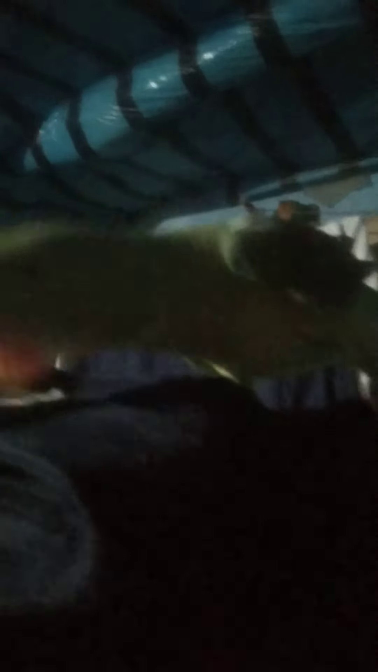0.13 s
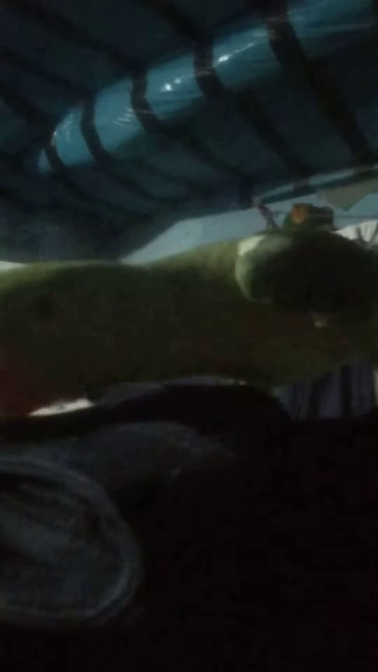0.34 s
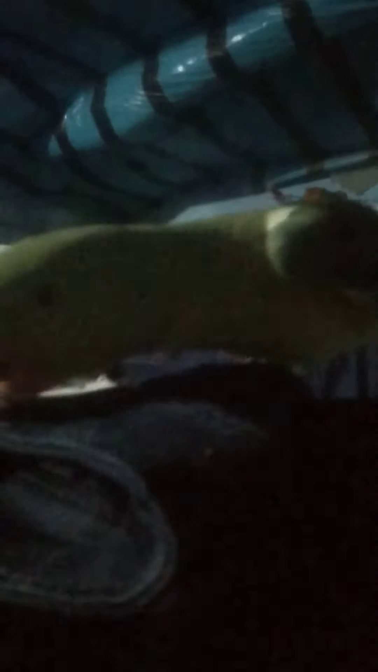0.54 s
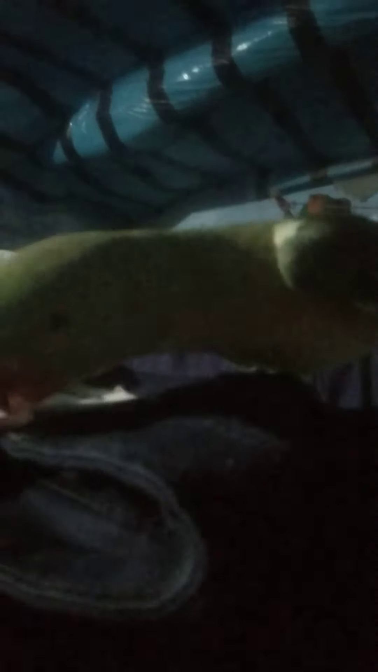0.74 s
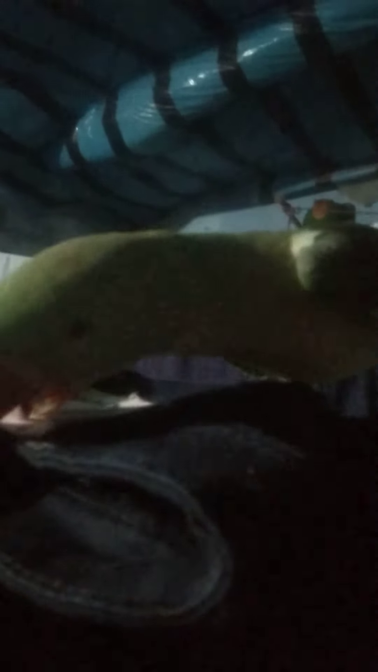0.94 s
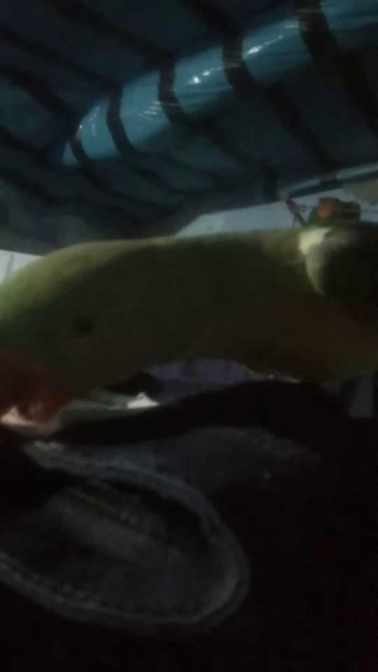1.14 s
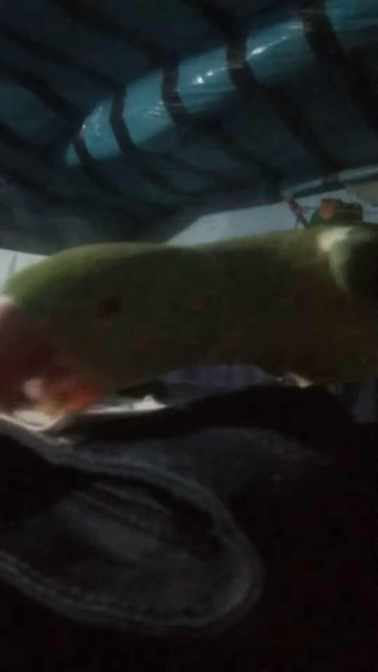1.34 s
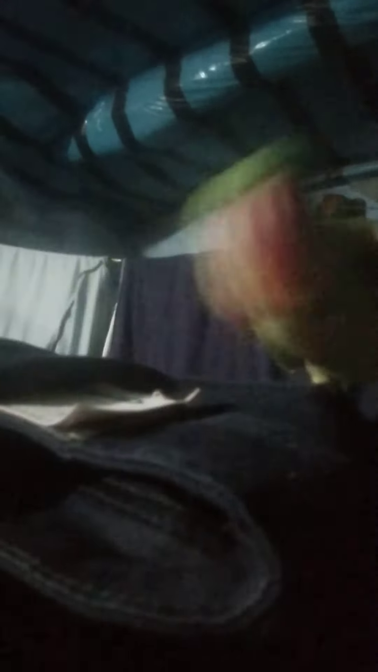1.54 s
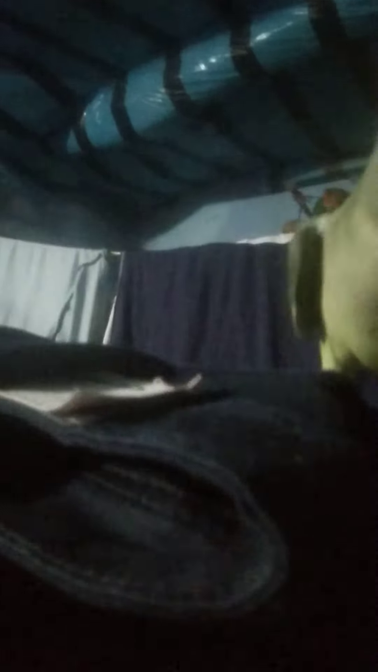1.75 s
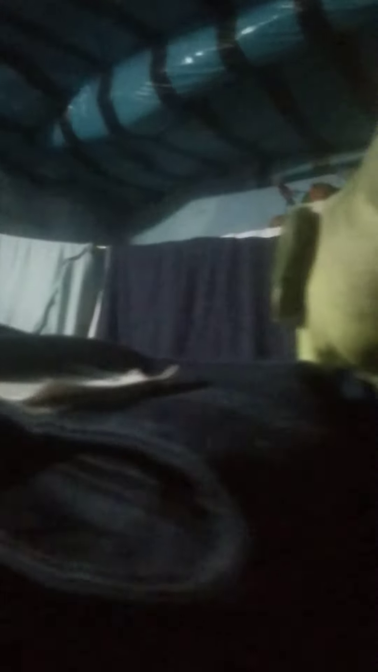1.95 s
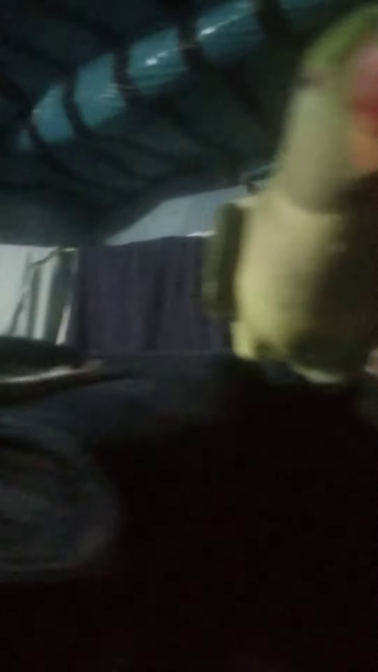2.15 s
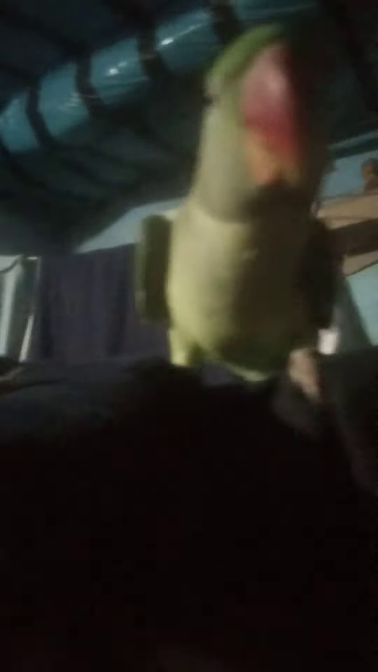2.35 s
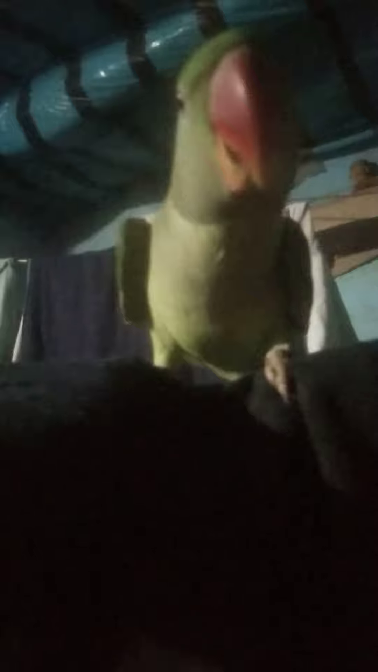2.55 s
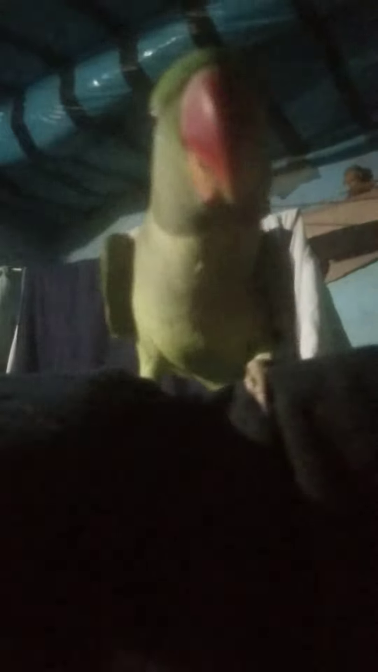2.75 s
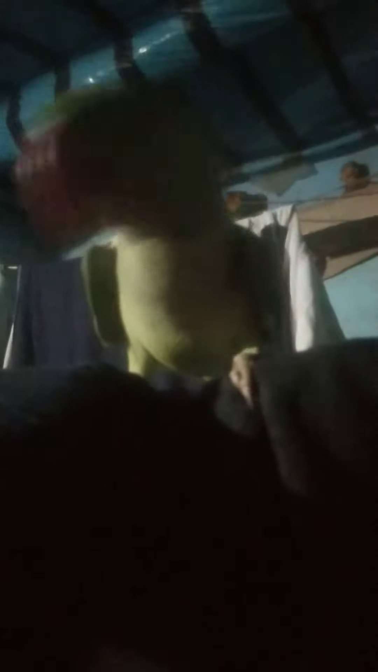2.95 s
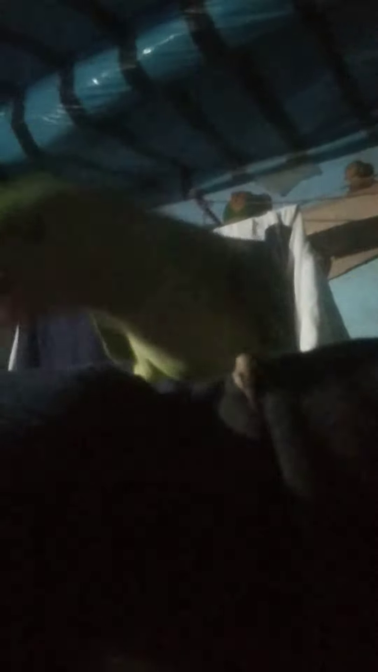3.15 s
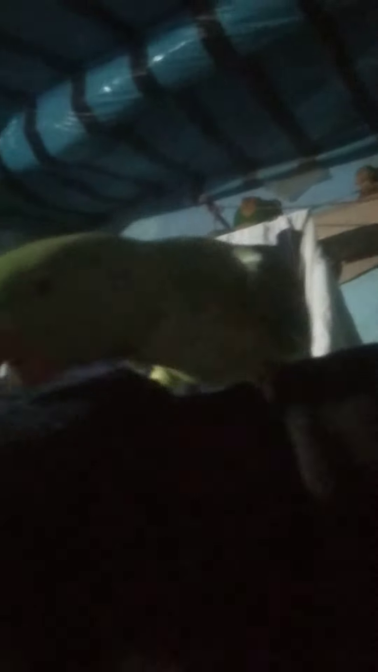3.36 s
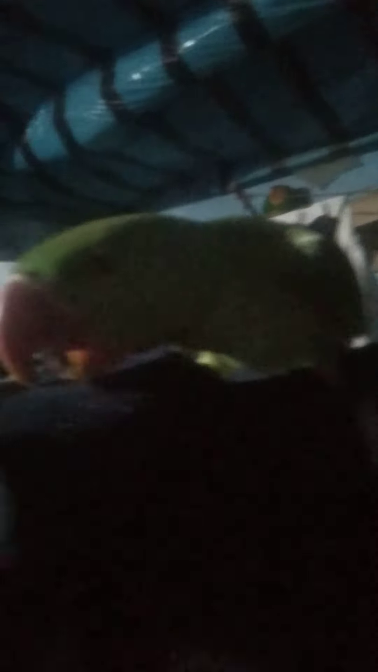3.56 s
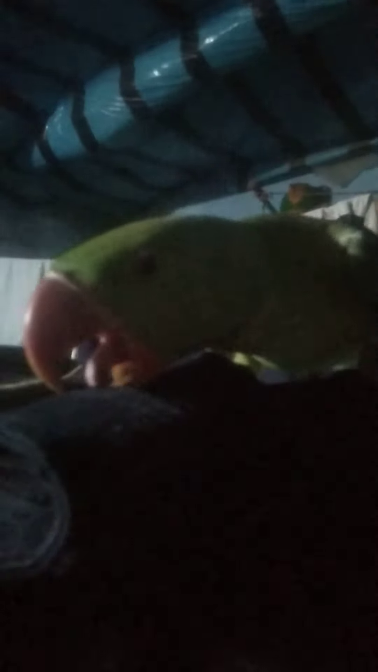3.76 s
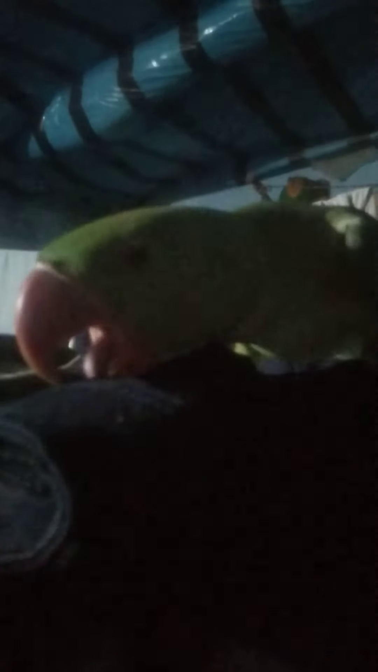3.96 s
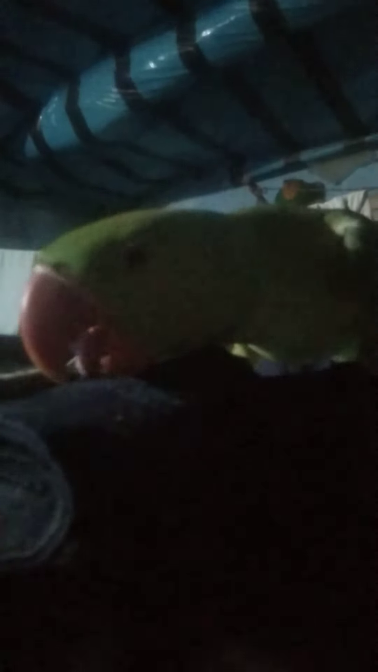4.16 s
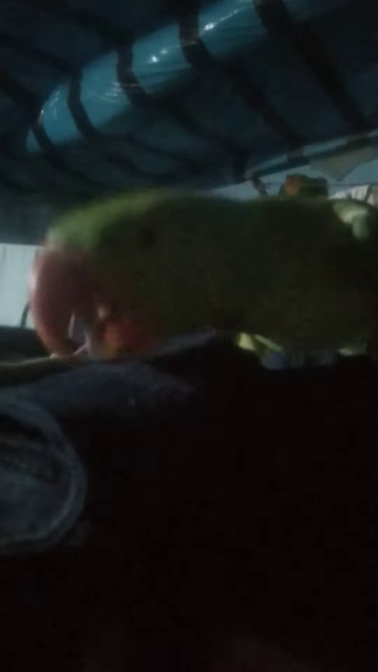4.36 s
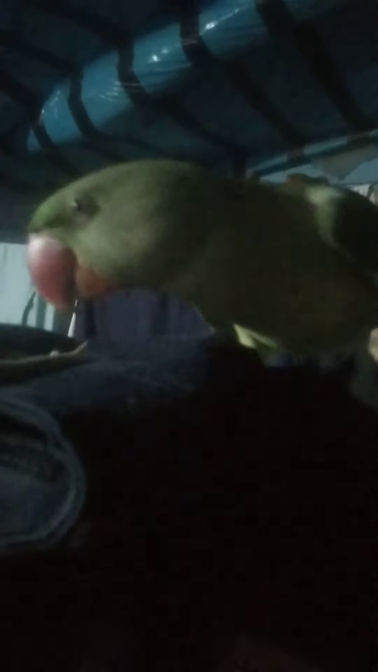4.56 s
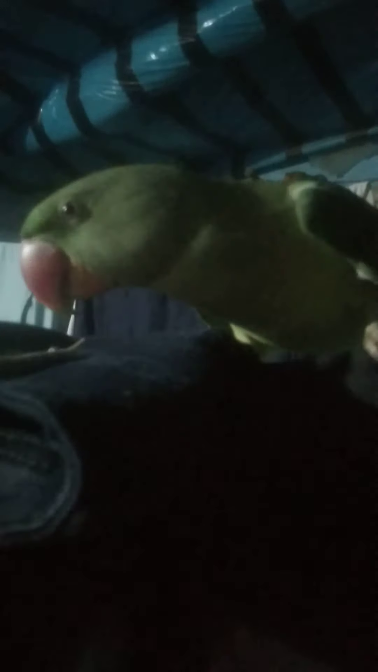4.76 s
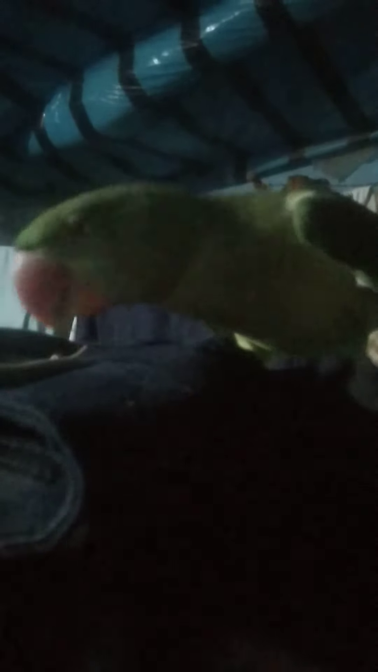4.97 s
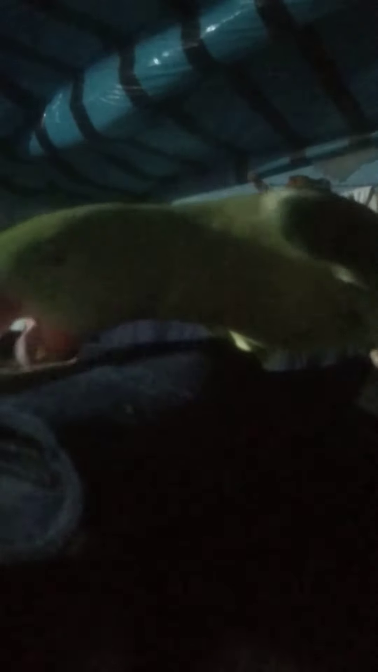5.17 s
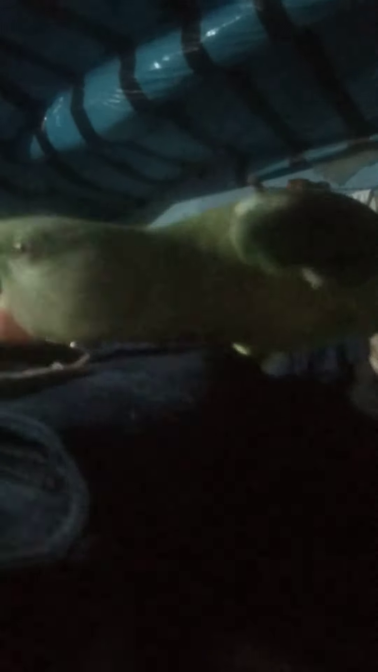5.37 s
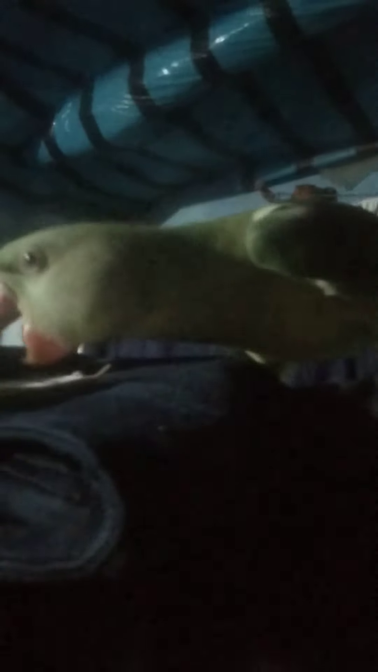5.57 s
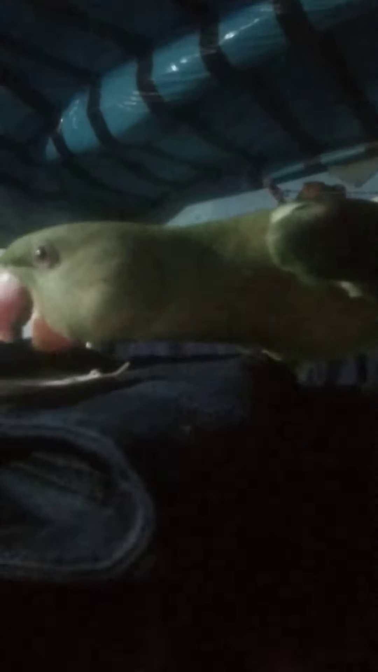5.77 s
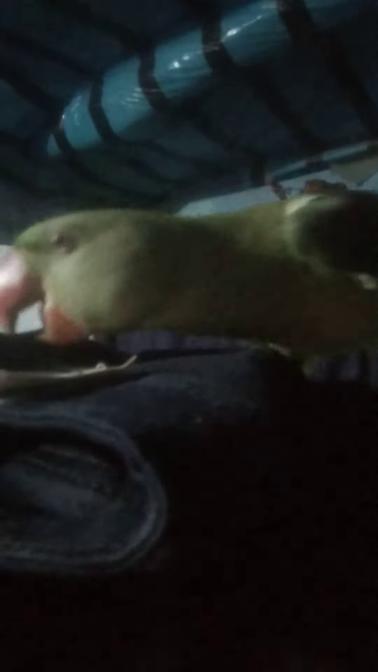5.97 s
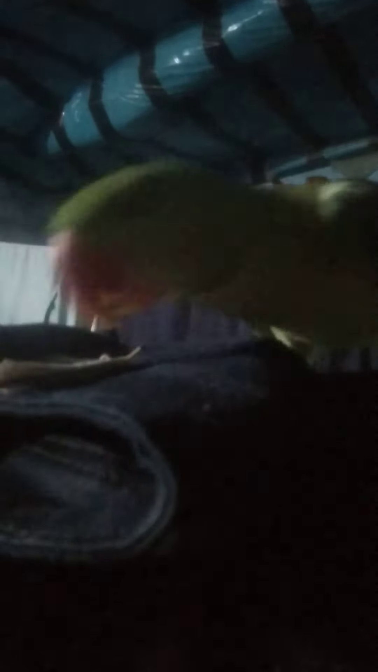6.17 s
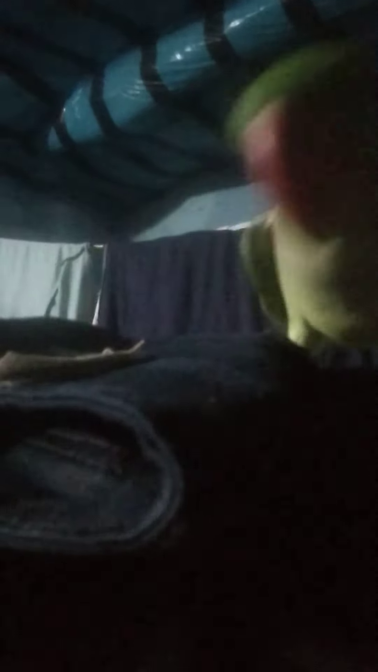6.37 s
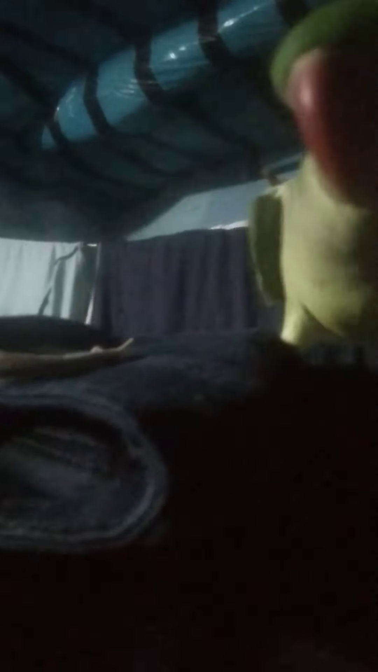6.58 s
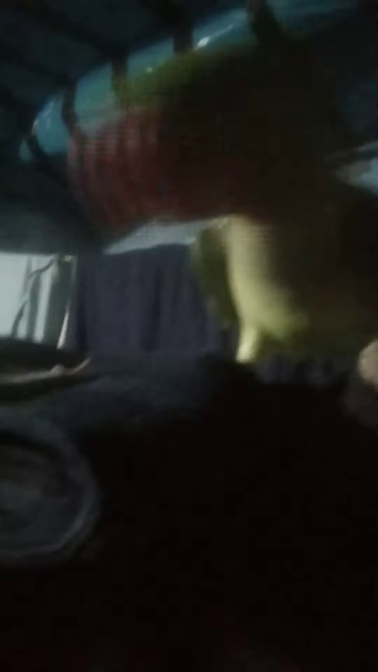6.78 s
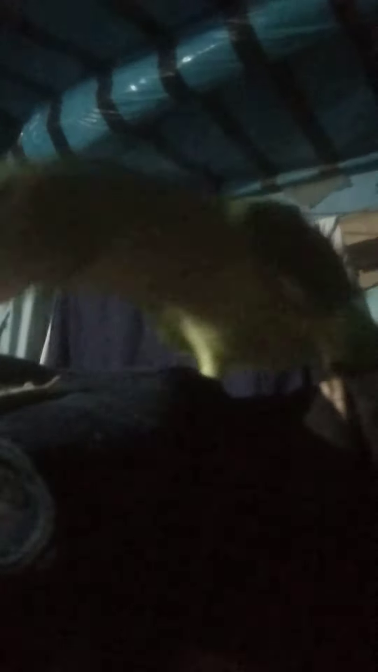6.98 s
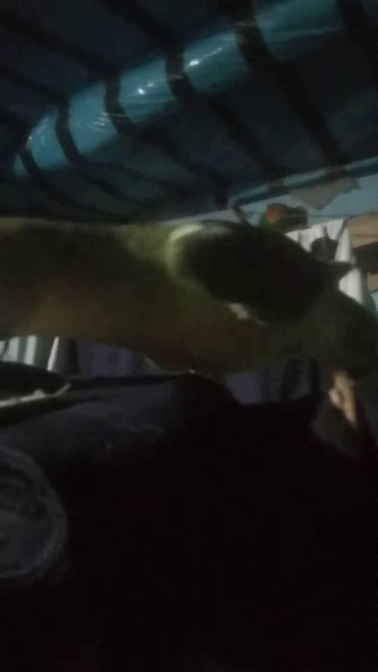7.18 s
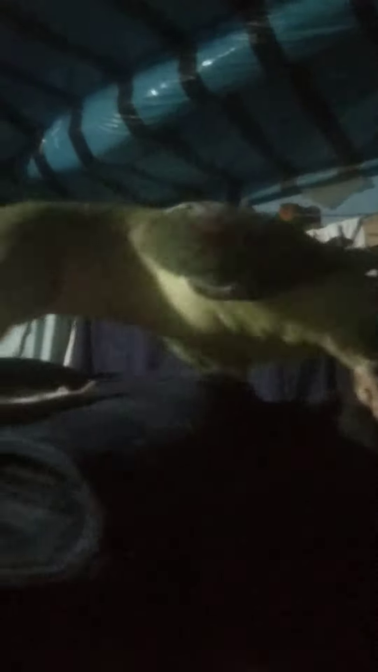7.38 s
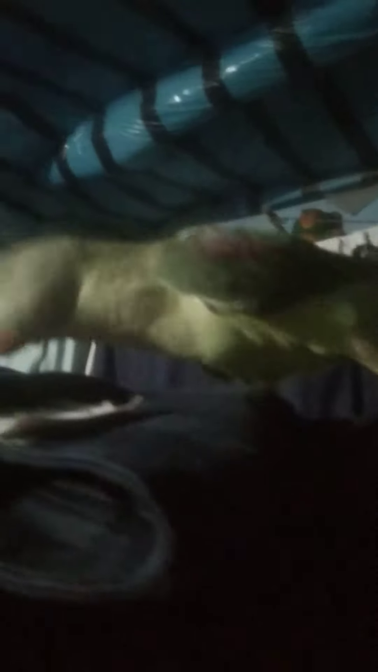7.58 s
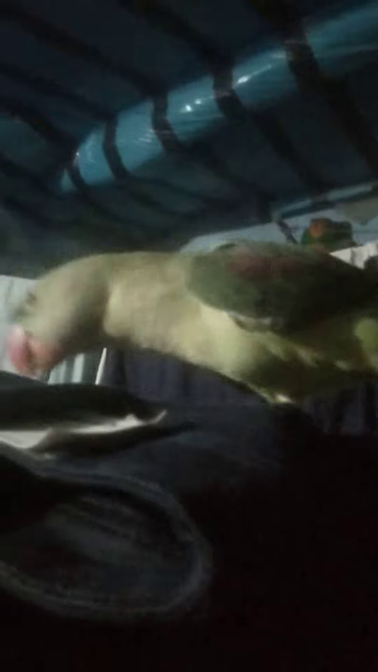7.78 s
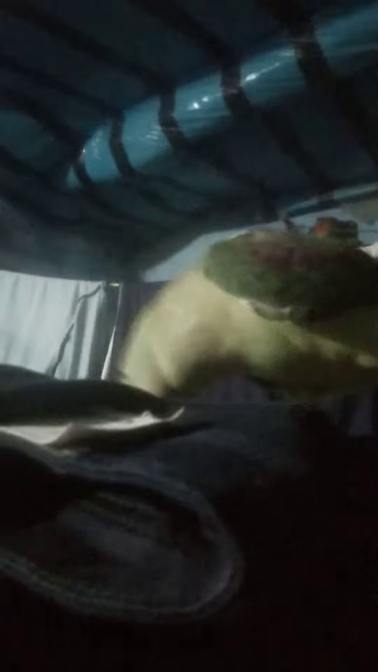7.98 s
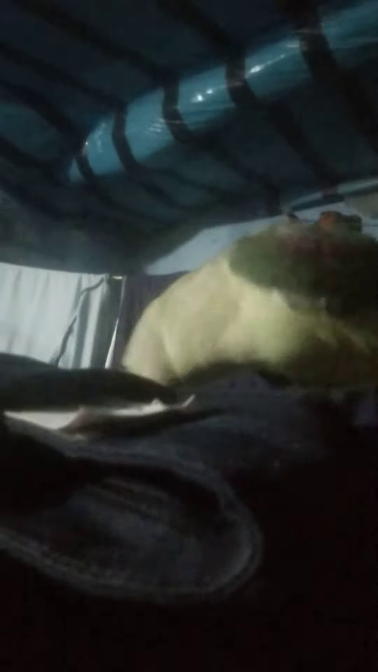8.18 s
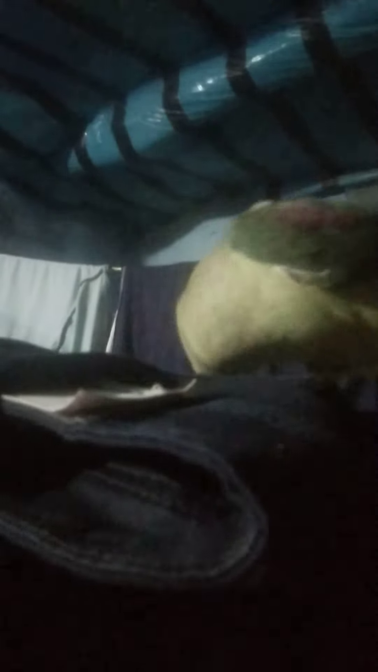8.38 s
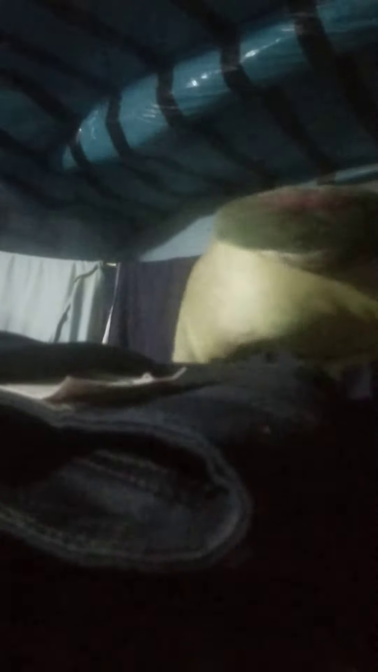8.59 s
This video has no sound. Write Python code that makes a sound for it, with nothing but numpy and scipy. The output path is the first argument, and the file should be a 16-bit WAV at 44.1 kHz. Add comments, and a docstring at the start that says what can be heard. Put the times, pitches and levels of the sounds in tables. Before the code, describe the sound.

Sharp, dry clicks come in four short runs as a parrot taps and bites at a phone with its beak, close by. A soft footstep on cloth falls after the first run, and another just before the last, which is quieter. The clicks shift between hollow and bright, with very little echo in the small room. Underneath, a motor hums faintly beneath an even hiss.

```python
"""Dry little clicks, about four a second in four bouts: a parrot nibbles a phone in a small, soft room.
Each bite is a few quick taps of the beak. Every tap rings five resonances (pitches that sound briefly):
hollow, knock, clack, rim and edge, from low to high. All five shift from tap to tap as the beak closes.
Twice the bird steps on cloth with a soft thud. Behind it all, a faint motor hums under a steady hiss."""
import sys
import numpy as np
from scipy import signal
from scipy.fft import rfft, irfft
from scipy.io import wavfile
from scipy.ndimage import uniform_filter1d, minimum_filter1d

SR = 44100
rng = np.random.default_rng(int(sys.argv[2]) if len(sys.argv) > 2 else 0)


def transcribe(signal):
    """Save signal, clipped to [-1, 1], as a 16-bit WAV file at the path in sys.argv[1]."""
    frames = np.atleast_2d(signal).T
    limited = np.clip(frames, -1, 1)
    pcm = np.round(limited * 32767).astype(np.int16)
    wavfile.write(sys.argv[1], SR, pcm)


N = 381024


def from_db(db):
    """Turns decibels into a number to multiply a sound by."""
    return 10 ** (np.asarray(db) / 20)


def unit(x):
    """Scales a sound so that its average level (rms) is one."""
    return x / np.sqrt(np.mean(x ** 2) + 1e-30)


def along(points, hz):
    """Reads between the rows of a (frequency, value) table, giving each octave equal space."""
    f, value = np.transpose(points)
    return np.interp(np.log(hz + 1), np.log(f + 1), value)


def add(mix, s, sound):
    """Mixes in a sound with its middle at s seconds."""
    part = mix[round(s * SR) - len(sound) // 2:][:len(sound)]
    part += sound[:len(part)]


def drift(rate_hz):
    """A slow random wobble, mostly slower than rate_hz."""
    hz = np.fft.rfftfreq(N, 1 / SR)
    return unit(irfft(rfft(rng.standard_normal(N)) / (1 + (hz / rate_hz) ** 4), N))


# the tone of the hiss, from bass to treble: (frequency [Hz], relative level [dB])
HISS_COLOUR = [(25, -22), (42, -12), (70, -0.5), (270, 1), (340, -3), (1400, -4.5), (2100, -1.5),
               (2600, -4.5), (4250, -6), (4750, -11), (6300, -6.5), (7200, -13), (8400, -28.5),
               (12000, -41), (15500, -37)]
# broad resonances in the room's air: (frequency [Hz], width [Hz], boost [dB])
AIR_RESONANCES = [(1043, 75, 6.5), (1716, 210, 3.5)]

def hiss(level_db=-53):
    """The air and the microphone make a steady noise, a little stronger around two pitches."""
    hz = np.fft.rfftfreq(N, 1 / SR)
    peaks_db = sum(db / (1 + (2 * (hz - f) / width) ** 2) for f, width, db in AIR_RESONANCES)
    colour = from_db(along(HISS_COLOUR, hz) + peaks_db)
    return from_db(level_db) * unit(irfft(rfft(rng.standard_normal(N)) * colour, N))


# the motor's tones: (pitch [Hz], average level [dB])
MOTOR_TONES = [(75.4, -70), (100, -72.5), (150.7, -68), (199.2, -89), (226.1, -78.5), (301.5, -67.5),
               (554.5, -73.5), (602.9, -79), (651.4, -87.5)]

def motor_hum():
    """A motor hums with low tones that waver a little in loudness and pitch."""
    t, out = np.arange(N) / SR, np.zeros(N)
    for hz, db in MOTOR_TONES:
        flutter = 1 + .28 * drift(3)
        tone = np.sin(2 * np.pi * hz * t + .5 * drift(4))
        out += from_db(db) * unit(flutter * tone)
    return out


# steps on the cloth: (time [s], level before fading [dB], pitch [Hz], fade in and out [s])
FOOTFALLS = [(2.272, -40, 96, 0.0026), (7.166, -35.5, 92.5, 0.0023)]

def footsteps():
    """A foot lands on cloth and gives it one soft, low push."""
    out, t = np.zeros(N), np.arange(-SR // 10, SR // 10) / SR
    for s, db, hz, fade_s in FOOTFALLS:
        add(out, s, from_db(db) * np.sin(2 * np.pi * hz * t) / np.cosh(t / fade_s))
    return out


# how fast the echo dies away: (frequency [Hz], time to fade by 60 dB [s])
ECHO_FADE = [(300, 0.15), (1000, 0.15), (2500, 0.12), (4000, 0.12), (7000, 0.11), (12000, 0.038)]
# the tone the room gives its echo: (frequency [Hz], boost or cut [dB])
ECHO_COLOUR = [(500, 8), (1100, -5.5), (1700, 8), (2400, -3), (3100, 0), (4000, -1), (4600, 3), (5300, 8),
               (6500, 2), (8000, 12.5), (12000, -5.5)]

def room_echo(sound, near_db=-16, near_s=0.0094, spread_s=0.0046, tail_db=-17, onset_s=0.0014):
    """Nearby surfaces throw back quick echoes, then a short tail; the paths change as the head moves."""
    paths, size = 3, 16384
    out, t, clock = np.zeros(N), np.arange(size) / SR, np.arange(N) / SR
    times, room_db, *_ = np.transpose(BITE_SPOTS)  # listed with the bites below
    sent = sound * from_db(np.interp(clock, times, room_db))
    colour = from_db(along(ECHO_COLOUR, np.fft.rfftfreq(size, 1 / SR)))
    for k in range(paths):
        near, tail = rng.standard_normal((2, size))
        near *= np.exp(-.5 * ((t - near_s) / spread_s) ** 2) * (1 - np.exp(-(2 * t / near_s) ** 2))
        hz, age, bands = signal.stft(tail, SR, nperseg=128)
        fade = from_db(-60 * age / along(ECHO_FADE, hz)[:, None])  # the treble dies first
        tail = signal.istft(bands * fade, SR)[1][:size]
        tail *= 1 - np.exp(-(t / onset_s) ** 2)
        echo = from_db(near_db) * near / np.linalg.norm(near)
        echo += from_db(tail_db) * tail / np.linalg.norm(tail)
        share = np.sqrt(2 / paths) * np.cos(np.pi * (clock + k / paths))  # the paths take turns
        out += signal.oaconvolve(sent * share, irfft(rfft(echo) * colour))[:N]
    return out


# the five resonances, hollow to edge; a wider one rings more briefly: (width [Hz])
RING_WIDTHS = [490, 526, 650, 880, 690]
# how the microphone hears the ringing: (frequency [Hz], boost or cut [dB])
MIC_COLOUR = [(100, -8.5), (400, -1), (600, -9.5), (760, -2.5), (1200, -1.5), (1650, -7), (2200, 3.5),
              (2750, 6), (3150, 3), (3600, 5), (6700, -0.5), (8300, -14.5), (12000, -31.5), (15500, -20.5)]
# the bare tick of a beak on a hard surface: (frequency [Hz], relative level [dB])
TICK_COLOUR = [(200, -15.5), (450, -12.5), (800, 4), (3000, 9), (6800, -22), (8300, -24.5), (10000, -27),
               (12500, -32.5), (15000, -33)]

def beak_tap(pitches, levels_db, tick_db, scuff=1.57, grip_s=0.0017, slip_s=0.0022, swell_s=0.000717):
    """The beak grips, snaps and slips; this short push makes a tick and rings five resonances."""
    size, level_span_s = 2048, .005
    t, hz = (np.arange(size) - size // 2) / SR, np.fft.rfftfreq(size, 1 / SR)
    grit = rng.standard_normal(size) * np.exp(-np.where(t < 0, (t / grip_s) ** 2, t / slip_s))
    force = rfft((t == 0) + scuff * grit / np.linalg.norm(grit))  # one sharp click plus a scrape
    # little sound gets into the air below the lowest resonance
    bass_cut = from_db(-17) + 1 / (1 + (0.58 * pitches[0] / (hz + 1)) ** 10)
    # the rings need a moment to swell, so they start early and peak on the tap
    head_start = np.exp(2j * np.pi * (rng.random() + hz * swell_s))
    to_mic = bass_cut * from_db(along(MIC_COLOUR, hz)) * head_start
    sound = np.zeros(size)
    for k, (pitch, width, db) in enumerate(zip(pitches, RING_WIDTHS, levels_db)):
        # flipping every other ring makes neighbours cancel at the pitches between them
        ring = (-1) ** k / (1 + 2j * (hz - pitch) / width) ** 2
        sound += from_db(db) * unit(irfft(force * ring * to_mic))
    tick = unit(irfft(force * from_db(along(TICK_COLOUR, hz))))
    sound += from_db(tick_db) * np.std(sound) * tick
    return sound * np.sqrt(level_span_s * SR / size)  # levels count as averages over this short span


# where the beak is at work; a farther spot has more echo, a harder one more tick:
# (time [s], level sent to the room [dB], tick compared with the rings [dB],
#  rim compared with the other four rings [dB], edge pitch [Hz])
BITE_SPOTS = [(.3, 0.5, -11.5, -25.5, 5950), (.55, -5, -11.5, -27, 6630), (1.2, -2, -11.5, -24, 6600),
              (1.5, -2.5, -9.5, -14.5, 6600), (3.3, 1.5, -15, -17.5, 6700), (3.7, -2, -25.5, -16, 6100),
              (4.17, -3, -19.5, -19, 6490), (4.4, 1.5, -30, -19, 6340), (5.3, 2, -11.5, -15, 6330),
              (5.75, 2.5, -22, -19.5, 6480), (6, 1.5, -21, -24, 6200), (6.2, -1.5, -6.5, -49, 6420),
              (7.2, 4, -9, -39, 6930), (7.8, 4, -15, -31, 6800)]
# as the beak closes, hollow, clack and rim rise while knock and edge fall: (pitch step [ratio])
CLOSING_RATIOS = [1.112, 0.97, 1.014, 1.043, 0.982]
# a harder tap brings out the knock and the clack; hollow to edge: (growth [dB per dB of force])
RING_GROWTH = [0.91, 1.76, 1.3, 0.73, 0.82]
# one row a bite; forces are compared with the snap, the last three levels with the knock:
# (snap time [s], snap level [dB], touch comes earlier by [s], touch force [dB],
#  rebound comes later by [s], rebound force [dB], hollow pitch [Hz], knock pitch [Hz],
#  clack pitch [Hz], hollow level [dB], clack level [dB], edge level [dB])
BEAK_BITES = [(0.315, -12, .0045, -15, 0.0032, -2, 1130, 2550, 3500, -14.5, -2.5, -28),
              (0.5443, -24, .0085, -4, 0.01, -10, 880, 2060, 3520, -10.5, -8.5, -24),
              (0.7639, -28.5, 0.0027, -3.5, 0.0076, 0.5, 780, 2340, 3600, -3, -2.5, -10),
              (1.018, -21.5, .0032, -15, .0077, -4.5, 880, 2300, 3590, -9.5, -9.5, -21.5),
              (1.248, -18, 0.0079, -4.5, 0.012, -12, 900, 2100, 4120, -13.5, -10.5, -16.5),
              (1.481, -19, .004, -17, .0114, -2, 990, 2130, 4160, -7, -8.5, -18.5),
              (3.3413, -17, .005, -2, .007, -19, 1160, 2510, 3750, -16.5, -9, -14.5),
              (3.5535, -25.5, 0.0046, -8, .0047, -3, 1010, 2820, 3800, -10, 0, -13.5),
              (3.7673, -14, 0.0068, -9, 0.0062, -14, 1150, 2560, 3930, -7.5, 3.5, -9),
              (3.9685, -18, .0066, -6, 0.0042, 4, 1160, 2580, 3920, -6.5, 6.5, -5),
              (4.1748, -8.5, .0038, -10, .0024, -4, 984, 2550, 3760, -13.5, 0.5, -15),
              (4.4019, -19.5, .0032, -1, .0052, -1.5, 1260, 2480, 3990, -5.5, 16.5, 4),
              (5.2644, -17, .004, -21, 0.0034, 1.5, 1010, 2330, 4150, -15.5, -10, -11.5),
              (5.4799, -29.5, 0.0034, -5, 0.0092, -9, 915, 1940, 3430, -5.5, -8, -14.5),
              (5.7371, -20, .0145, -21, .009, -20, 1280, 2560, 3750, -10.5, -31, -17.5),
              (5.977, -15, 0.0037, -22, .004, -1, 1220, 2410, 3700, -16.5, -24, -16.5),
              (6.0064, -23.5, 0.022, -5.5, .004, -21, 1230, 2400, 3800, -10.5, -21, -15),
              (6.1838, -15.5, .0135, -26, 0.0039, -7, 1450, 2370, 3950, -3, -6, 2),
              (6.2002, -21.5, .004, -10, 0.0071, -17, 1400, 2150, 3920, 6, -1, 8),
              (7.2173, -22.5, .0038, -2, 0.0078, -16, 1250, 2130, 3950, -1, -4.5, -12.5),
              (7.4441, -27.5, 0.0016, -7.5, 0.0053, -26, 1140, 2150, 3830, -3, 2.5, -20),
              (7.663, -46.5, .003, -15, 0.013, -3, 1000, 2400, 3880, 0, 13, 10),
              (7.748, -40.5, .003, -15, 0.0091, -11, 1080, 2030, 3920, 2, 25, 15),
              (7.7743, -32, 0.0035, -15, 0.0074, -9, 1450, 2650, 3700, 3, 1, -10.5)]

def nibbling(chatter_s=0.0083, chatter_db=-18):
    """Each bite is a touch, a snap, a rebound and a faint chatter; pitches shift as the beak closes."""
    out = np.zeros(N)
    rim_hz = 4870  # at the snap
    times, _, *spot_curves = np.transpose(BITE_SPOTS)
    for s, snap_db, lead_s, touch_db, lag_s, rebound_db, *rings in BEAK_BITES:
        hollow_hz, knock_hz, clack_hz, hollow_db, clack_db, edge_db = rings
        tick_db, rim_db, edge_hz = (np.interp(s, times, curve) for curve in spot_curves)
        snap_pitches = np.array([hollow_hz, knock_hz, clack_hz, rim_hz, edge_hz])
        total_db = 20 * np.log10(np.linalg.norm(from_db([hollow_db, 0, clack_db, edge_db])))
        balance_db = np.array([hollow_db, 0, clack_db, total_db + rim_db, edge_db]) - total_db
        # (delay [s], force [dB], how far the beak has closed [steps])
        taps = [(-lead_s, touch_db, -1), (0, 0, 0), (lag_s, rebound_db, 1),
                (lag_s + chatter_s, rebound_db + chatter_db, 1)]
        for delay_s, force_db, closed in taps:
            pitches = snap_pitches * np.array(CLOSING_RATIOS) ** closed
            levels_db = snap_db + balance_db + force_db * np.array(RING_GROWTH)
            add(out, s + delay_s, beak_tap(pitches, levels_db, tick_db))
    return out


def scene():
    """The bird close by and the room behind it, in one channel."""
    bites = nibbling()
    return (bites + room_echo(bites) + footsteps() + motor_hum() + hiss())[None]


def record(dry, ceiling=.8, hold_samples=129, top_hz=15750):
    """Turns the volume down smoothly around any peak that is too loud, then cuts the highest treble."""
    allowed = np.minimum(1, ceiling / (abs(dry) + 1e-9))
    gain = minimum_filter1d(allowed, hold_samples)
    for _ in range(2):  # round off the dips in volume
        gain = uniform_filter1d(gain, hold_samples // 2)
    treble_cut = signal.firwin(511, top_hz, window=("kaiser", 9), fs=SR)
    return signal.oaconvolve(dry * gain, treble_cut[None], "same")


dry = scene()
out = record(dry)
transcribe(out)
```